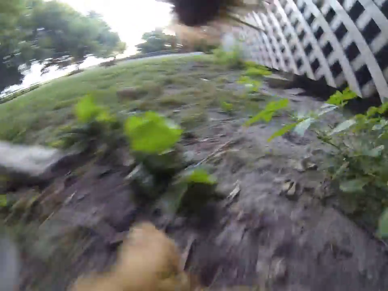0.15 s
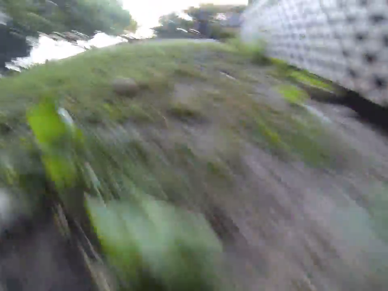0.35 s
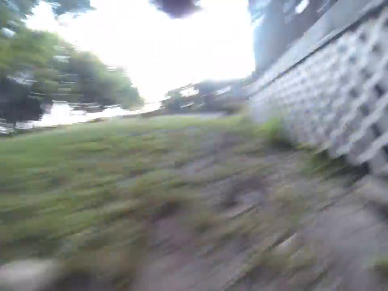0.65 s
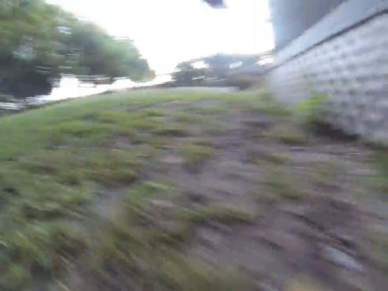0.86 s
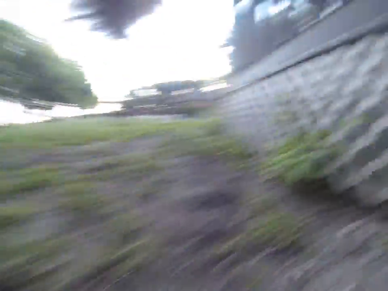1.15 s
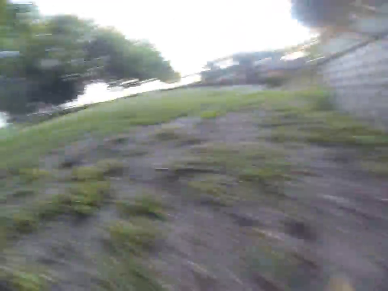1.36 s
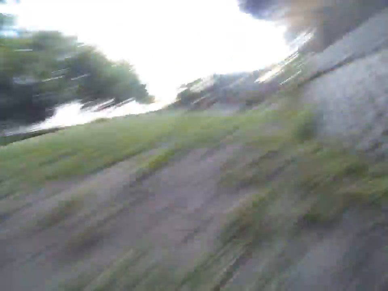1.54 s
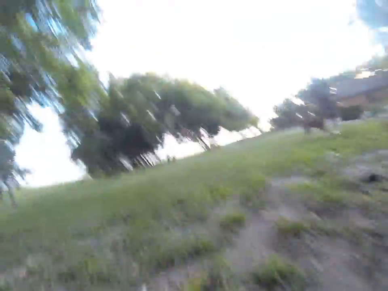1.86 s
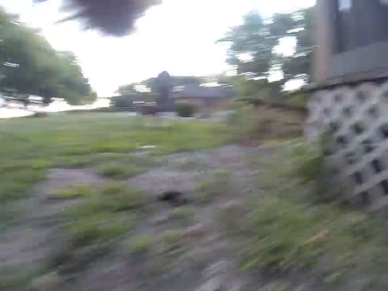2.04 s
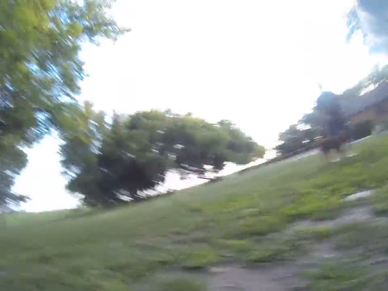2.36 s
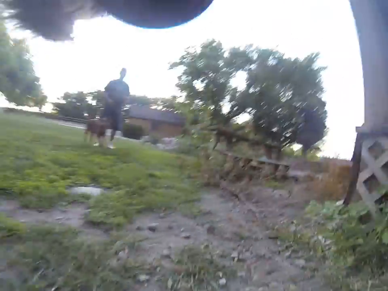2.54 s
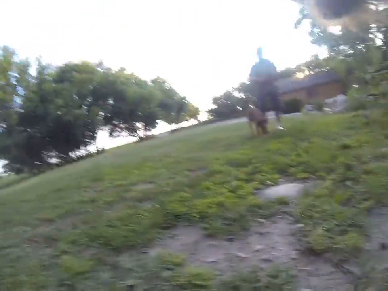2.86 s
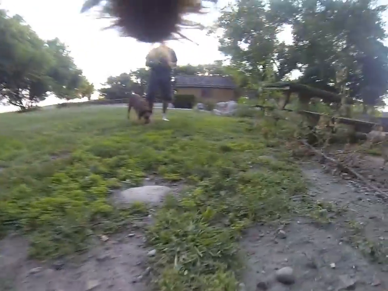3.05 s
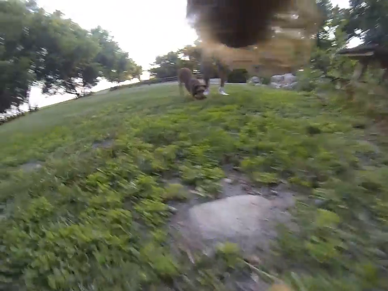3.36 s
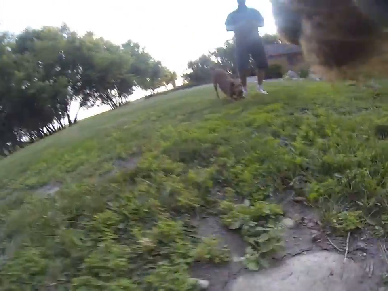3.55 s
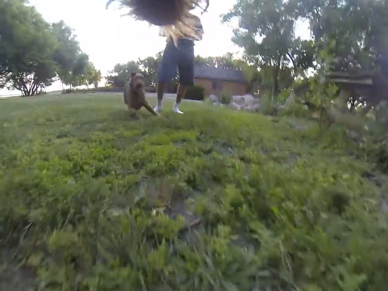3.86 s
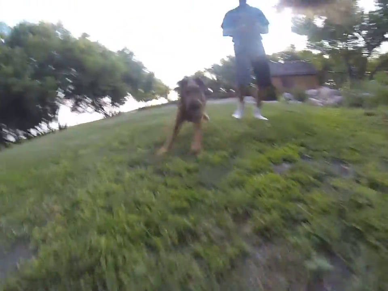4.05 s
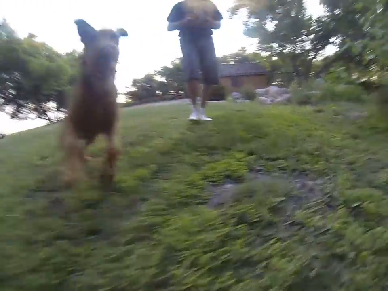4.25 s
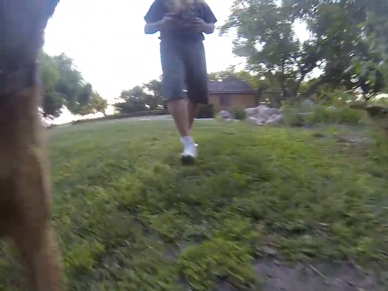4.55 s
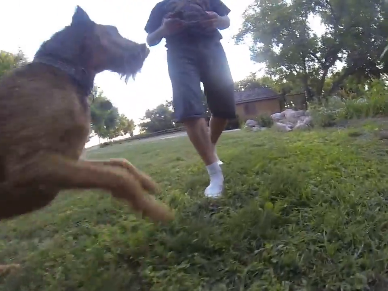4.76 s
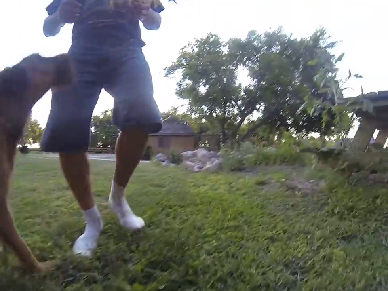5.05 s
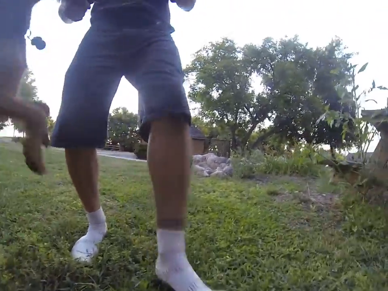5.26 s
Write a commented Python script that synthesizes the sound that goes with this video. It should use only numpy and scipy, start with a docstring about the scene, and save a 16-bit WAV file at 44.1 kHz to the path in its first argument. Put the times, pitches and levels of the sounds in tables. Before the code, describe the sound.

A loose camera on a running dog's chest knocks and clatters hard in its plastic mount, with gritty rattling, dull thumps and low wind buffeting.

```python
"""A loose camera strikes its mount: damped contact modes, cracks and case resonances make short plastic knocks.
The camera rides in a plastic case on the chest of a dog running across a lawn; the hardest knocks overload its
input. While the joint slides, random slips excite gritty chatter and lighter impacts make taps. The dog's body
thumps the case and the loudest knocks bring low pulses, both as decaying sines, and a collar tag tinkles as a
narrow resonance. Shaped noise gives the air that buffets the case with the pace and with every jolt, and a
quiet hiss."""
import sys
import numpy as np
from scipy import signal
from scipy.fft import rfft, irfft
from scipy.io import wavfile
from scipy.ndimage import uniform_filter1d

SR = 44100
rng = np.random.default_rng(int(sys.argv[2]) if len(sys.argv) > 2 else 0)


def put_to_file(sound):
    """Save the sound as 16-bit audio at rate SR, in the file named by the first command-line argument."""
    columns = np.atleast_2d(sound).T  # one column per channel
    safe = np.clip(columns, -1, 1)
    whole_steps = np.round(safe * 32767)
    wavfile.write(sys.argv[1], SR, whole_steps.astype(np.int16))


N = 238256
TIME = np.arange(N) / SR

# hard strikes of the camera on its mount:
# (time [s], level of the contact ring [dB], contact pitch [Hz], crack against ring before a fixed lift [dB])
STRIKES = [(0.0132, -18, 1325, 5), (0.0284, -12.5, 1520, 4.5), (0.071, -18, 2330, 0),
           (0.1585, -16, 1530, 0.5), (0.22, -5.5, 1440, -6.5), (0.2655, -1, 1422, -17.5),
           (0.3608, -5, 1377, -36.5), (0.403, -6, 1304, -10.5), (0.6817, 2.5, 1545, -8),
           (0.7402, -13, 1320, -10.5), (0.758, -11, 1410, -27), (0.8165, -13, 1290, -22),
           (0.8398, -13.5, 1380, -30), (0.8565, -9, 1510, -50), (0.866, -6.5, 1370, -48),
           (1.0156, -3.5, 1487, -7), (1.0617, -17, 1670, 2.5), (1.0741, -9, 2170, -4),
           (1.0927, -17, 1494, 0), (1.2429, -9, 1410, -15), (1.3372, -12, 1880, -13),
           (1.3585, -15, 1210, -9.5), (1.4617, -13.5, 1430, 1.5), (1.5042, -3.5, 1523, -7.5),
           (1.551, -10, 1579, -1), (1.616, -18, 1590, 3.5), (1.9564, -2, 2147, -7), (2.05, -9, 1550, -5.5),
           (2.1477, 0, 1234, -9.5), (2.2256, -11, 1380, -8), (2.2745, -10, 2420, -8.5),
           (2.4255, -2.5, 2227, -6.5), (2.6857, -3.5, 1926, -11), (2.946, -18.5, 2183, -4),
           (2.967, -6, 2030, -13), (3.0055, -3, 1437, -6.5), (3.0471, -5.5, 1410, -15),
           (3.0959, -16, 1568, -17), (3.1495, -20, 1424, 7), (3.178, -16.5, 1440, 5.5),
           (3.183, -13, 1605, -2), (3.2096, -15.5, 2970, -1), (3.231, -8, 2500, -4.5),
           (3.243, -6.5, 1196, -1.5), (3.3268, -8.5, 2215, -6), (3.482, -14, 1543, -5.5),
           (3.495, -7, 1524, -8.5), (3.5682, -17.5, 1472, -9.5), (3.609, -12.5, 2500, 4),
           (3.6156, -10, 1680, -2), (3.7012, -6.5, 1518, -10), (3.8161, -8.5, 1945, -15.5),
           (3.8437, -10, 1632, -29), (3.8497, -6, 1443, -19), (3.8849, -17, 1685, -8),
           (3.926, -13, 1840, -6), (3.9374, -12, 1710, -20), (3.968, -9, 2250, -4),
           (4.0093, -17, 2530, -1.5), (4.2022, -22, 1610, 3.5), (4.2374, -4, 1464, -11.5),
           (4.2603, -12, 1563, 1.5), (4.3099, -4, 1550, -7.5), (4.3414, -15.5, 1593, -3.5),
           (4.3639, -13.5, 1570, -8), (4.4264, -19, 1530, -10.5), (4.5484, -3, 2006, -12.5),
           (4.575, -11, 2164, -15), (4.586, -12.5, 1480, -7), (4.634, -28, 2720, 8.5),
           (4.646, -14.5, 1581, -0.5), (4.8563, -5.5, 2056, -12.5), (5.0427, -11, 1400, -14),
           (5.0688, -11.5, 1393, -29), (5.1177, -13.5, 1380, -3.5), (5.1542, -17, 1418, -42),
           (5.1632, -13, 1369, -47), (5.238, -11, 1425, -9), (5.3102, -13, 1560, -4)]
# faint ringing of a small metal part after a strike:
# (frequency [Hz], level against the strike before a random factor [dB], t60 [s])
METAL_MODES = [(2640, -56.5, .4), (3580, -60.5, 0.72)]
# resonances of the plastic case, before strain: (frequency [Hz], width of one filter pass [Hz], level [dB])
CASE_MODES = [(282, 630, -3.5), (680, 600, 2), (1490, 399, 17.5), (2364, 320, 8), (2990, 900, 0),
              (4700, 790, -28), (6500, 350, -49.5)]
# spectrum of sharp contact noise: (frequency [Hz], relative level [dB])
CRACK_SPECTRUM = [(300, -22.5), (1200, -18.5), (2400, 16), (3500, 9), (4700, -5), (7200, -5.5),
                  (9000, -19.5), (12500, -18.5), (16000, -47)]
# spells of joint sliding: (start [s], end [s], level [dB], contact pitch [Hz], relative grit [dB])
JOINT_SLIDES = [(0.02, 0.132, -23.5, 1510, 9), (0.298, 0.38, -26.5, 2180, 2),
                (0.765, 0.869, -22.5, 1220, -7.5), (1.058, 1.168, -25.5, 1514, -1.5),
                (1.463, 1.604, -29.5, 1620, 7), (1.782, 1.823, -29, 2030, -5.5),
                (1.986, 2.068, -24, 1820, 5.5), (2.166, 2.239, -25, 1335, 0.5),
                (2.434, 2.526, -21.5, 1460, 5), (2.97, 3.117, -33, 1601, 4.5),
                (3.155, 3.404, -28, 1423, 2.5), (3.401, 3.58, -34, 1477, -2),
                (3.582, 3.664, -26.5, 1500, 4.5), (3.654, 3.813, -32.5, 1536, 3.5),
                (3.863, 4.037, -32.5, 1402, -11), (4.046, 4.123, -31, 2340, 0), (4.25, 4.442, -31, 1416, 6),
                (4.652, 4.785, -42, 720, -6), (4.865, 4.992, -24.5, 2216, -6.5),
                (4.998, 5.133, -34.5, 1440, -10), (5.14, 5.196, -27.5, 1403, -41),
                (5.207, 5.3, -24.5, 1370, -8), (5.298, 5.396, -31.5, 2398, -11)]
# low thumps: soft blows through the harness, and low pulses that come with the loudest knocks (1.501, 1.956,
# 2.424 s): (time [s], level of the main sine at onset [dB], pitch [Hz], t60 [s])
LOW_THUMPS = [(0.617, -11.5, 105, .16), (1.337, 1, 132, 0.024), (1.355, -18, 100.3, 0.14),
              (1.501, -8, 68, .05), (1.752, -4.5, 168, .07), (1.956, -4.5, 90.34, .06),
              (2.364, -16, 102.3, .12), (2.424, -6.5, 72.7, .06), (2.948, -20.5, 107.3, .16),
              (3.246, -7, 246.4, 0.019), (4.544, -15.5, 83.6, .07)]
# clearest touches of the collar tag: (time [s], peak level [dB])
TAG_TOUCHES = [(0.2, -33), (0.579, -33.5), (0.794, -35), (1.587, -21.5), (1.68, -41), (1.81, -44),
               (2.92, -30.5), (3.469, -38), (3.539, -30)]
# air rushing past the case with the dog's pace: (time [s], reference level [dB])
PACE_WIND = [(0.0, -34), (0.56, -44), (1.8, -32.5), (2.89, -44), (3.79, -46.5), (4.15, -45), (4.39, -43),
             (5.4, -52)]
# spectrum of the buffeting air: (frequency [Hz], relative level [dB])
BUFFET_SPECTRUM = [(25, 3), (65, -4), (105, 3.5), (170, -18), (600, -39), (8000, -100)]
# spectrum of the outdoor hiss inside the case: (frequency [Hz], relative level [dB])
HISS_SPECTRUM = [(300, -4), (1000, -4), (1500, -1.5), (3400, -1), (4200, -20.5), (5300, -10), (6200, -22.5),
                 (14000, -27)]

# taps: rate, level over the slide, scatter, and crack against ring before the slide's grit
TAPS_PER_S, TAP_DB, TAP_SPREAD_DB, TAP_CRACK_DB = 18, 6, 1.5, -5
# light tag touches: level over the rushing air, scatter
TAG_DB, TAG_SPREAD_DB = -8, 1
# rumble over the rushing air; gust against its knock, and the gust's decay time constant
RUMBLE_DB, GUST_DB, GUST_S = 3, -24.5, 0.026
TOP_HZ = 15800


def knocks(size=16000):
    """Impact excitation: each hard blow also leaves lightly damped metal modes ringing."""
    out, t = np.zeros(N), TIME[:size]
    for s, db, hz, crack_db in STRIKES:
        add(out, s, knock(db, hz, crack_db))
        metal = np.zeros(size)
        for mode_hz, mode_db, t60 in METAL_MODES:
            metal += undb(db + mode_db) * rng.standard_normal() * ring(t, mode_hz, t60)
        add(out, s, metal)
    return out


def knock(db, hz, crack_db, size=4000, heft=0.9, split=0.072, jolt=0.11):
    """Modal superposition: one impact excites contact, crack, case and mount together."""
    t = TIME[:size]
    grit, shake, push = rng.standard_normal((3, size))

    # two close modes beat: the ring swells, dips and swells again
    tone = burst(ring(t, hz * (1 + split), 0.011) - ring(t, hz * (1 - split), 0.014))

    crack_rise = 1 - np.exp(-t / 0.0013)
    crack_decay = np.exp(-t / 0.0013) + undb(-25) * np.exp(-t / .005)
    crack = burst(colour(grit * crack_rise * crack_decay, CRACK_SPECTRUM))

    # sharp contacts shake the case more, and each strains it differently
    stretch = np.exp(0.069 * rng.uniform(-0.91, 1))
    shake_decay = np.exp(-t / 0.0025) + undb(-19.5) * np.exp(-t / 0.0048)
    shell = undb(jolt * crack_db - 3) * burst(case(shake * shake_decay, stretch))

    # heavy blows move the mount proportionally more; it also bobs on the harness
    mount = undb(heft * db - 7.5) * burst(band(push * np.exp(-t / 0.0012), 610, 1300))
    bob = undb(-16) * ring(t, 140 * stretch ** 2, 0.031)

    polarity = rng.choice([-1, 1])
    return undb(db) * polarity * (tone + undb(crack_db + 1.5) * crack + shell + mount + bob)


def taps(pitch_spread=0.15, crack_spread_db=7):
    """Intermittent contact: a sliding joint catches at uneven moments, following the slide's level and grit."""
    out = np.zeros(N)
    for start, end, db, hz, grit_db in JOINT_SLIDES:
        count = max(int(round((end - start) * TAPS_PER_S)), 1)
        # one random moment in each equal share of the slide
        times = start + (end - start) * (np.arange(count) + rng.random(count)) / count
        scatter = rng.uniform(-0.65, 1, (count, 3))
        for s, (force, place, edge) in zip(times, scatter):
            crack_db = TAP_CRACK_DB + grit_db + crack_spread_db * edge
            tap_db = db + TAP_DB + TAP_SPREAD_DB * force
            tap = knock(tap_db, hz * np.exp(pitch_spread * place), crack_db)
            # a sharper tap moves its energy from the ring into the crack
            add(out, s, tap / np.hypot(1, undb(crack_db)))
    return out


def chatter(slips_per_s=560, spread_db=6.0, sharpness=0.5, shift=0.12):
    """Stick-slip friction: dense uneven slips excite the contact and the case."""
    out, t = np.zeros(N), TIME[:SR // 20]
    for start, end, db, hz, grit_db in JOINT_SLIDES:
        size = max(int((end - start) * SR), 2)
        slip_happens = rng.random(size) < slips_per_s / SR
        slips = slip_happens * undb(spread_db * np.minimum(rng.exponential(size=size), 3.5))

        # every slip is a tiny scrape, dying in 0.7 ms, over a bed of steady friction
        force = signal.lfilter([1], [1, -np.exp(-1 / (.0007 * SR))], slips) + .13
        friction = force * signal.windows.tukey(size, .15) * rng.standard_normal(size)
        scrape = np.pad(friction, (0, SR // 20))

        # the contact point varies, so every slip rings at a slightly different pitch
        creak = np.zeros(len(scrape))
        for i in np.flatnonzero(slips):
            slip_hz = hz * np.exp(shift * rng.uniform(-1.5, 1))
            creak[i:i + len(t)] += slips[i] * ring(t, slip_hz, 0.018)

        # a stiffer contact rings higher and sounds grittier
        stiffness = (hz / 1500) ** sharpness
        grit = undb(grit_db - 8) * stiffness * unit(colour(scrape, CRACK_SPECTRUM))
        shell = min(stiffness, 1) * unit(case(scrape))
        contact = undb(-1.5) * unit(band(creak, hz, hz))
        add(out, start, undb(db) * burst(shell + contact + grit, size))
    return out


def thumps(size=9000):
    """Damped oscillation: the case bounces on the dog's chest, or pulses low with the loudest knocks, while the
    strap adds a dull noise burst."""
    out, t = np.zeros(N), TIME[:size]
    for s, db, hz, t60 in LOW_THUMPS:
        bounce = ring(t, hz, t60) + undb(-14) * ring(t, 1.2 * hz, t60 / 2)
        strap = unit(band(rng.standard_normal(size), 270, 450)) * np.exp(-t / 0.017)
        add(out, s, undb(db) * (undb(-18.5) * strap - bounce))
    return out


def tag(count=60):
    """Repeated light impacts: clear touches, and random ones that strengthen with the dog's pace."""
    out = np.zeros(N)
    touches = list(TAG_TOUCHES)
    for s in rng.uniform(0, N / SR, count):
        pace_db = np.interp(s, *np.transpose(PACE_WIND))
        touches.append((s, pace_db + TAG_DB + TAG_SPREAD_DB * rng.standard_normal()))
    for s, db in touches:
        add(out, s, undb(db) * tinkle())
    return out


def tinkle(size=3000):
    """Narrow-band resonance: one touch excites a small muffled metal disc; peak of one."""
    t = TIME[:size]
    touch = rng.standard_normal(size) * t * np.exp(-t / 0.0043)
    sound = band(touch, 7980, 310)
    return sound / np.abs(sound).max()


def air(hiss_share=0.8):
    """Turbulent pressure noise: rumble and hiss follow the pace, and each jolt adds a short gust."""
    speed_db = np.interp(TIME, *np.transpose(PACE_WIND))
    gusts = np.zeros(N)
    for s, db, *_ in STRIKES:
        add(gusts, s, undb(db + GUST_DB) * np.exp(-TIME[:SR // 2] / GUST_S))
    eddies_db = 3.2 * walk(20)
    # steady wind and gusts combine by power
    strength = np.hypot(undb(speed_db + RUMBLE_DB + eddies_db), gusts)
    rumble = unit(colour(rng.standard_normal(N), BUFFET_SPECTRUM)) * strength
    hiss = unit(colour(rng.standard_normal(N), HISS_SPECTRUM)) * undb(hiss_share * speed_db - 26.5)
    return rumble + hiss


def case(x, stretch=1):
    """Parallel resonance: the modes of the plastic case all shift together under strain."""
    return sum(undb(db) * band(x, hz * stretch, width) for hz, width, db in CASE_MODES)


def ring(t, hz, t60):
    """Free damped vibration: a sine falling by 60 dB in t60 seconds."""
    return np.sin(2 * np.pi * hz * t) * np.exp(-np.log(1000) * t / t60)


def band(x, hz, width_hz):
    """Cascaded resonance: two passes steepen the skirts, with gain one at the centre."""
    b, a = signal.iirpeak(min(hz, SR / 2 - 1), hz / min(width_hz, SR / 10), fs=SR)
    return signal.lfilter(b, a, signal.lfilter(b, a, x))


def colour(x, points, size=4096):
    """Minimum-phase filtering: a folded cepstrum gives a causal filter with the (Hz, dB) spectrum."""
    hz, db = np.transpose(points)
    f = np.maximum(np.fft.rfftfreq(size, 1 / SR), 1)
    gain = undb(np.interp(np.log(f), np.log(hz), db))
    cepstrum = irfft(np.log(gain))
    cepstrum[1:size // 2] *= 2
    cepstrum[size // 2 + 1:] = 0
    impulse_response = irfft(np.exp(rfft(cepstrum)))
    return signal.fftconvolve(x, impulse_response)[:len(x)]


def walk(rate):
    """Low-pass randomness: held random steps, smoothed twice, drift slowly with an rms of one."""
    k = int(SR / rate)
    steps = np.repeat(rng.standard_normal(N // k + 1), k)
    return unit(uniform_filter1d(uniform_filter1d(steps, k), k)[:N])


def undb(db):
    """Logarithmic level: decibels to amplitude gain."""
    return 10 ** (np.asarray(db) / 20)


def unit(x):
    """Power normalization: scale to an rms of one."""
    return x / np.sqrt(np.mean(x ** 2) + 1e-18)


def burst(x, size=220):
    """Onset normalization: scale to an rms of one over the first samples."""
    return x / np.sqrt(np.mean(x[:size] ** 2) + 1e-18)


def add(out, s, x):
    """Linear superposition: mix x into out from time s on."""
    i = int(np.clip(s * SR, 0, N - 1))
    out[i:i + len(x)] += x[:N - i]


def scene():
    """Superposition of pressures: everything reaches one microphone inside the case."""
    return (knocks() + thumps() + tag() + air() + chatter() + taps())[None]


def record(dry, knee=5):
    """Saturation and low-pass filtering: overload flattens the hardest knocks; the top is cut."""
    flattened = dry / (1 + np.abs(dry) ** knee) ** (1 / knee)
    softened = signal.sosfilt(signal.butter(2, 12000, fs=SR, output="sos"), flattened)
    return signal.sosfilt(signal.cheby1(10, .1, TOP_HZ, fs=SR, output="sos"), softened)


dry = scene()
out = record(dry)
put_to_file(out)
```